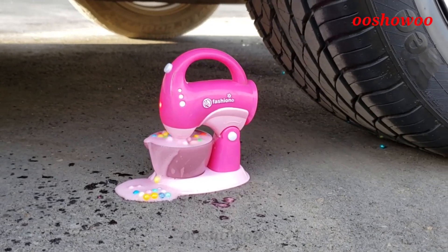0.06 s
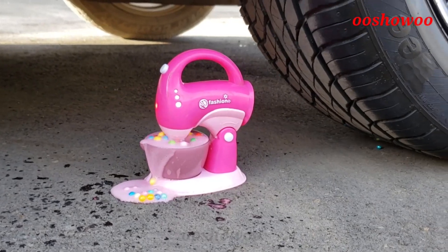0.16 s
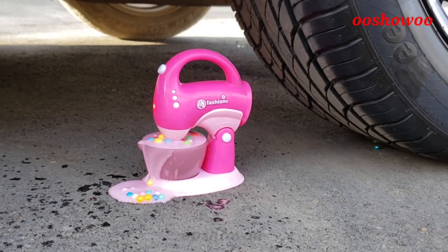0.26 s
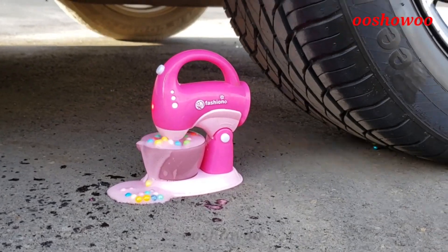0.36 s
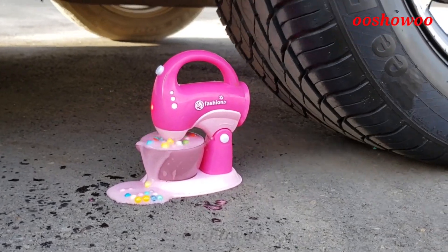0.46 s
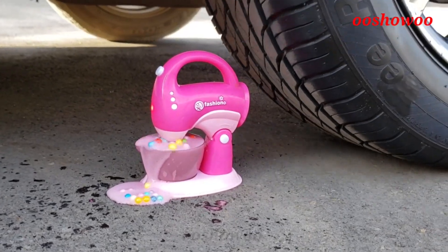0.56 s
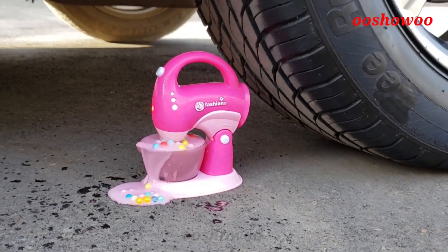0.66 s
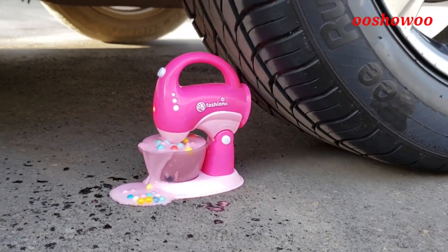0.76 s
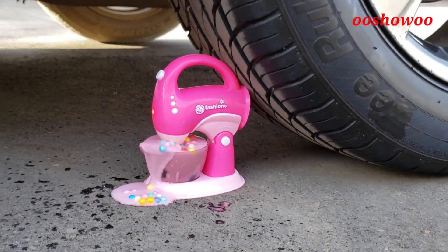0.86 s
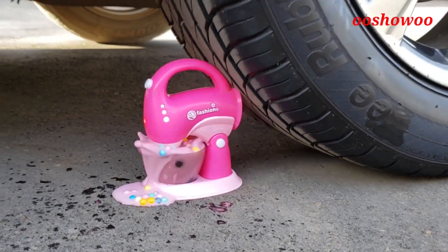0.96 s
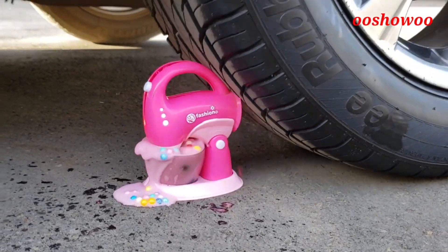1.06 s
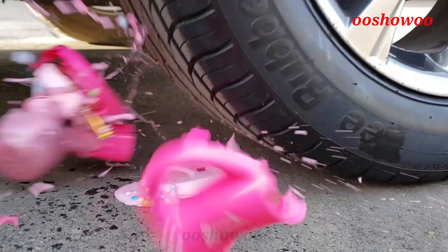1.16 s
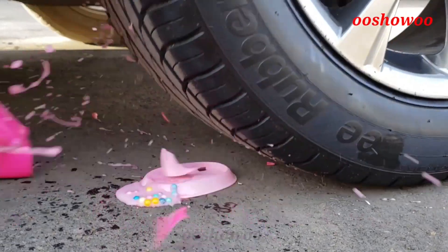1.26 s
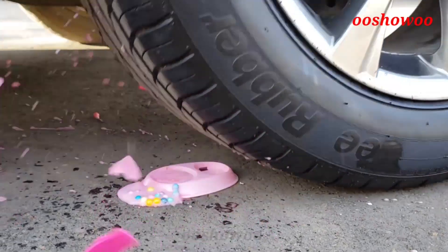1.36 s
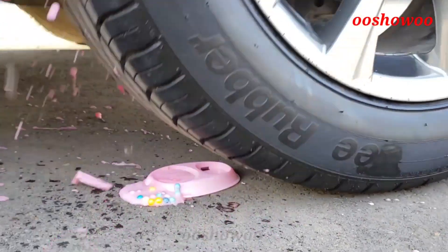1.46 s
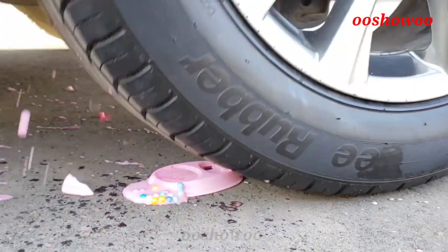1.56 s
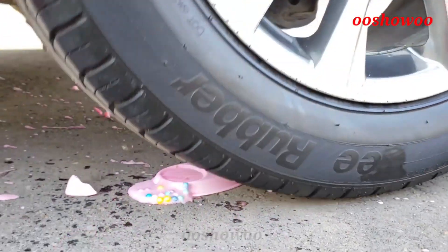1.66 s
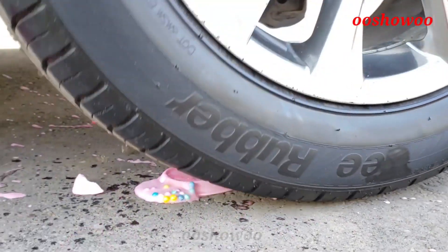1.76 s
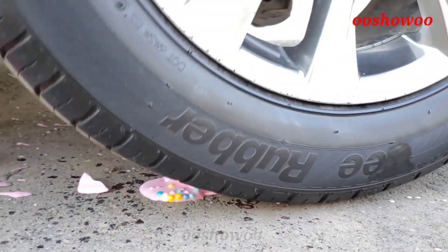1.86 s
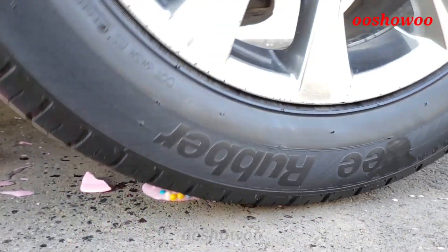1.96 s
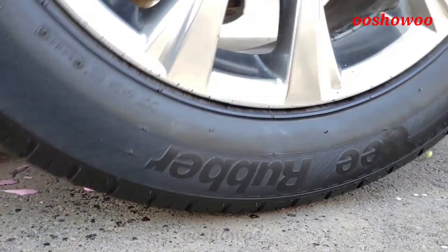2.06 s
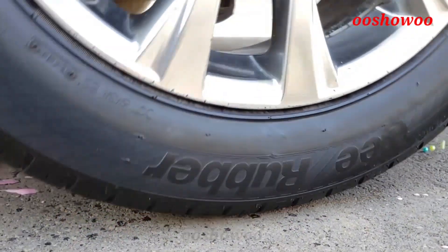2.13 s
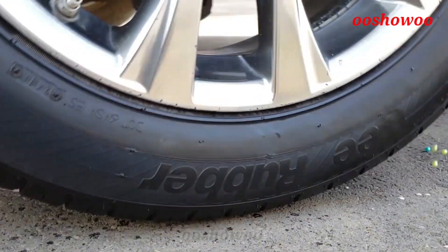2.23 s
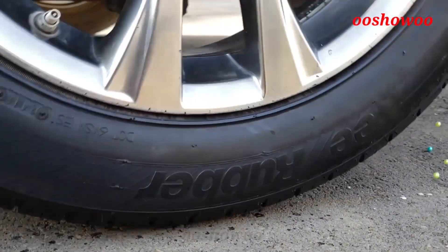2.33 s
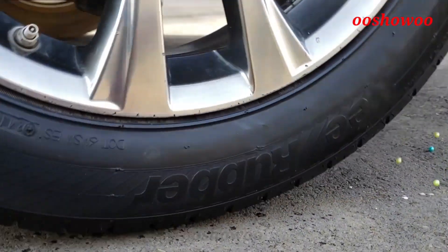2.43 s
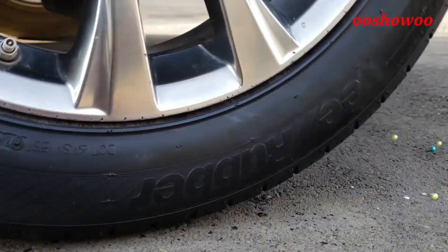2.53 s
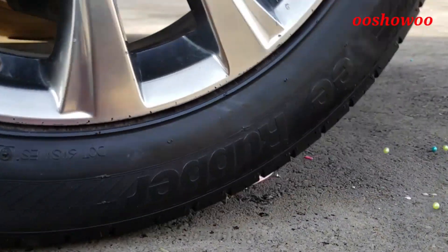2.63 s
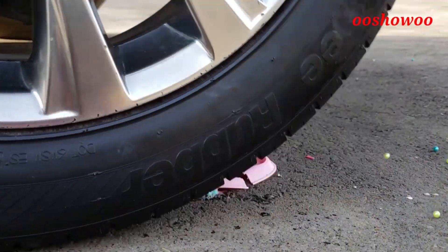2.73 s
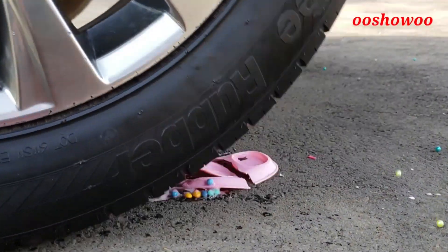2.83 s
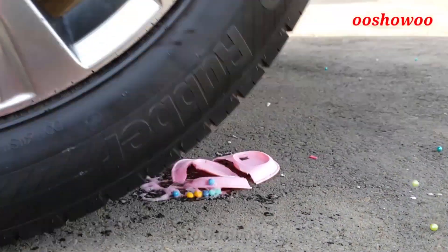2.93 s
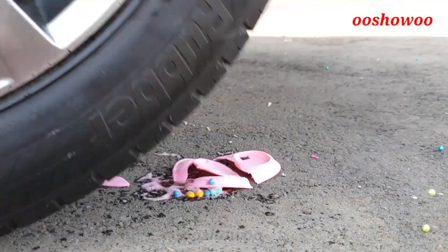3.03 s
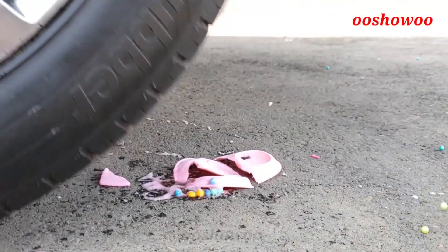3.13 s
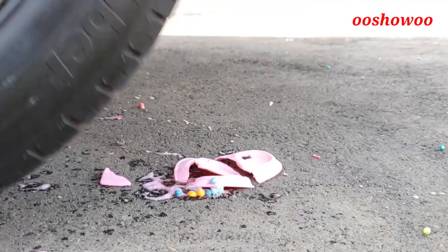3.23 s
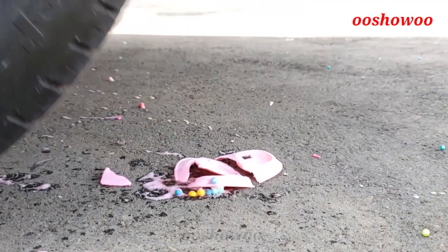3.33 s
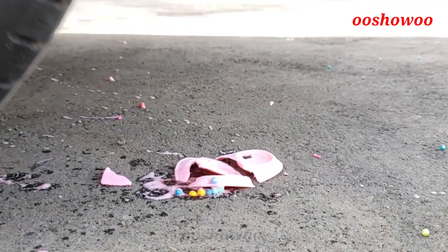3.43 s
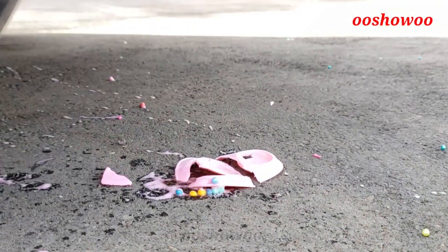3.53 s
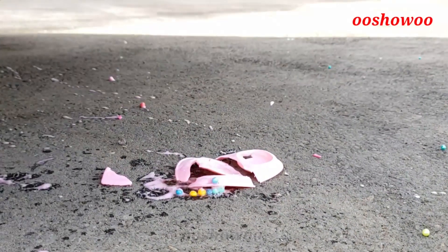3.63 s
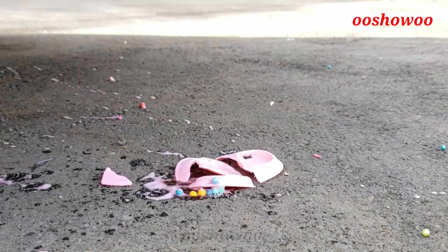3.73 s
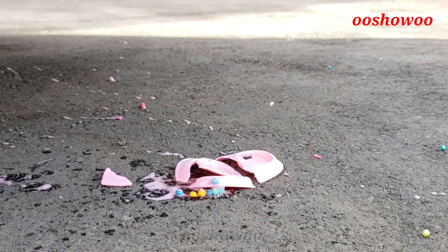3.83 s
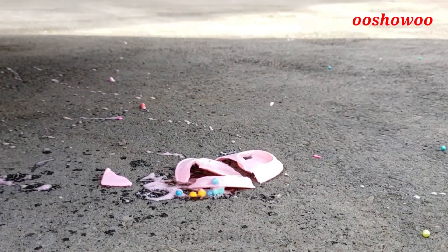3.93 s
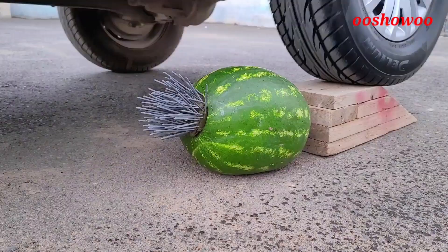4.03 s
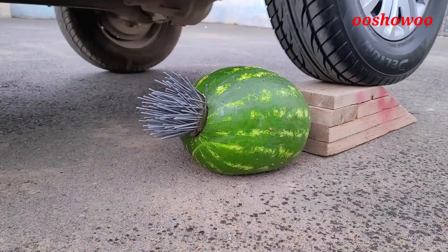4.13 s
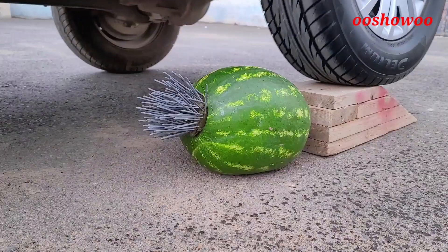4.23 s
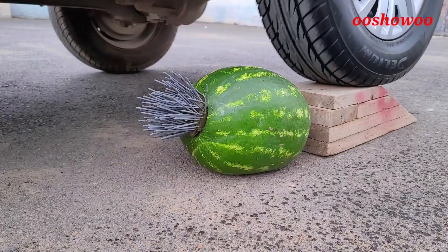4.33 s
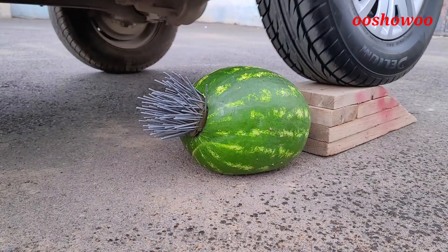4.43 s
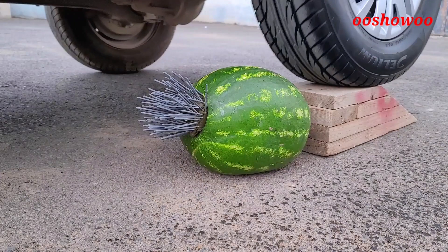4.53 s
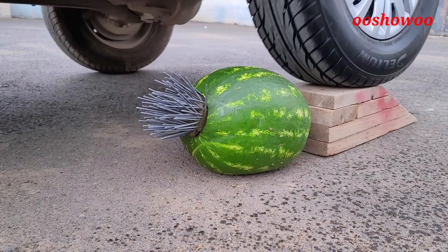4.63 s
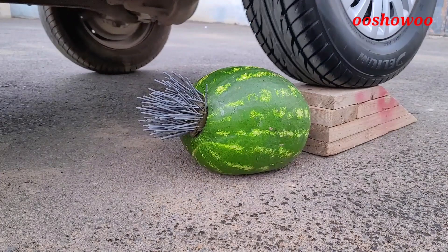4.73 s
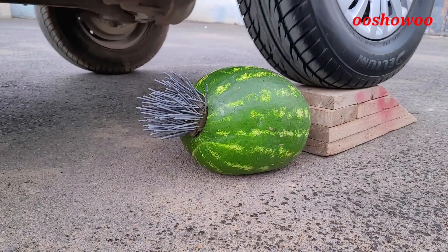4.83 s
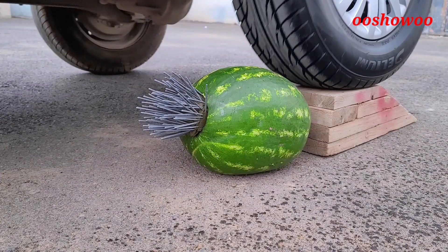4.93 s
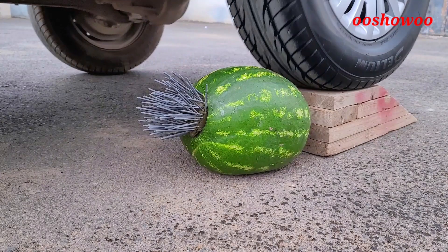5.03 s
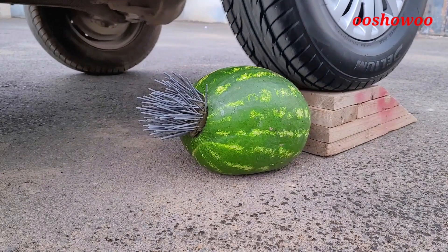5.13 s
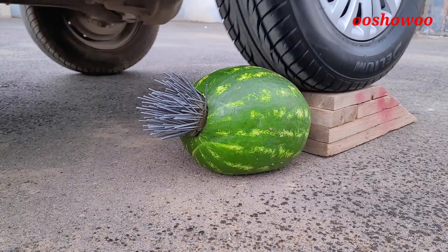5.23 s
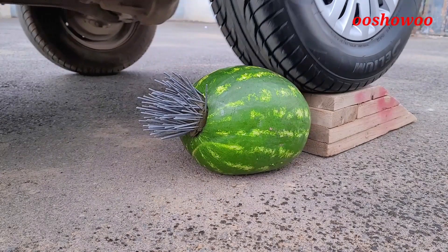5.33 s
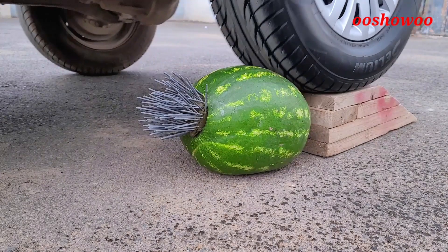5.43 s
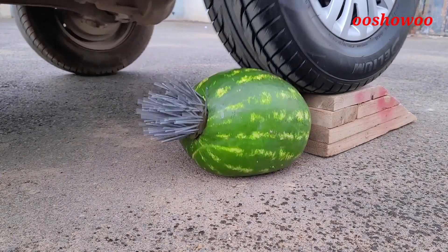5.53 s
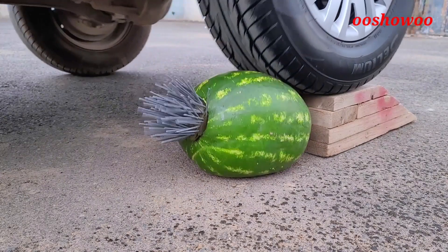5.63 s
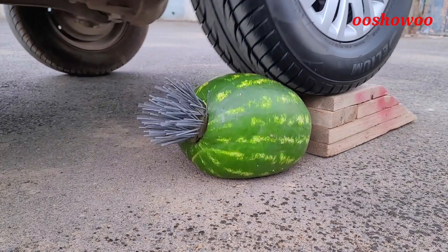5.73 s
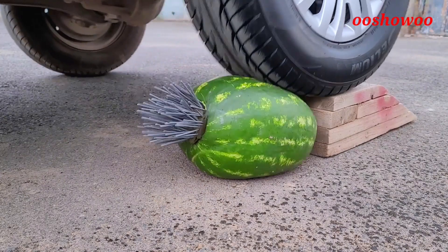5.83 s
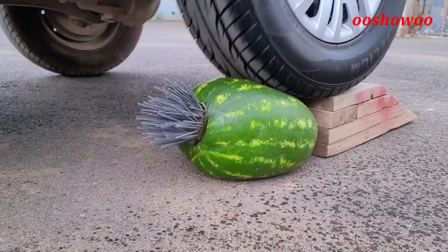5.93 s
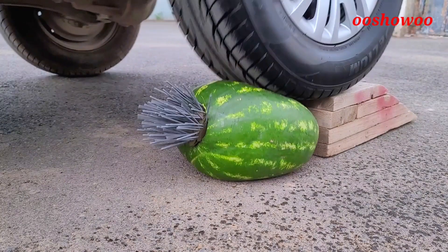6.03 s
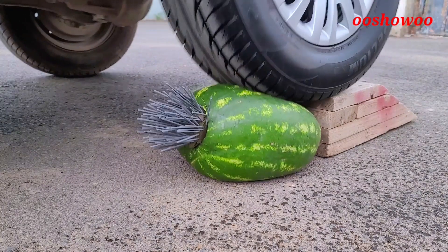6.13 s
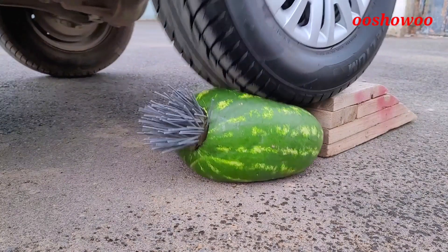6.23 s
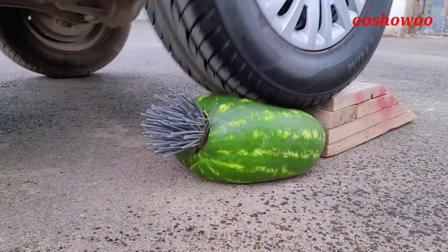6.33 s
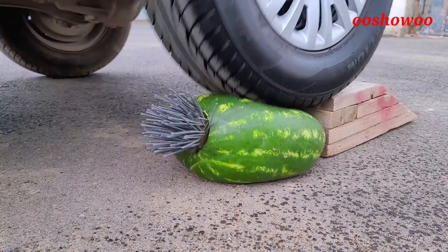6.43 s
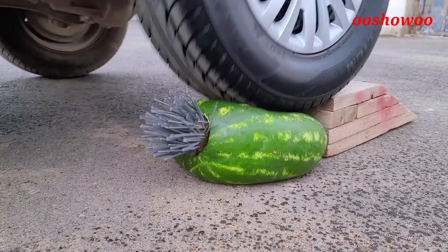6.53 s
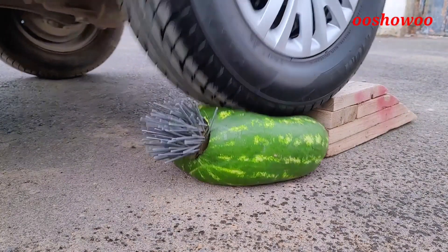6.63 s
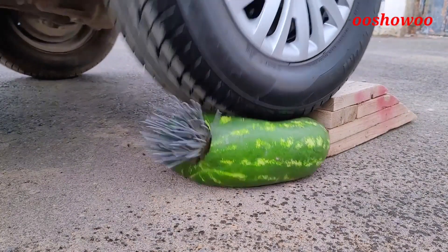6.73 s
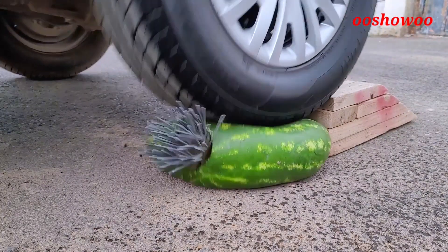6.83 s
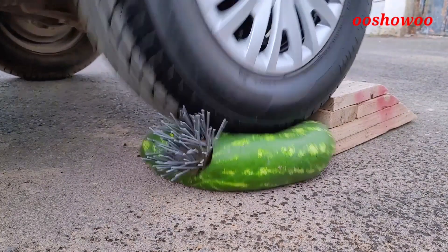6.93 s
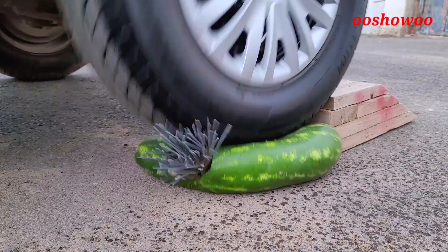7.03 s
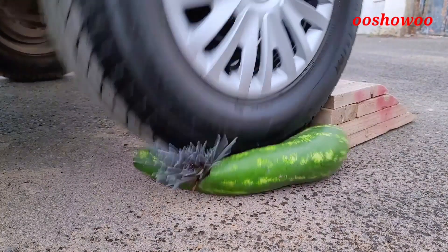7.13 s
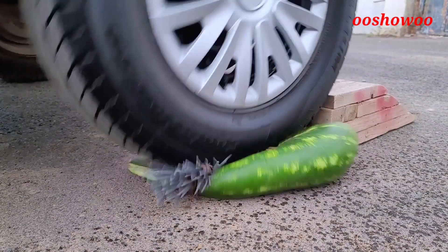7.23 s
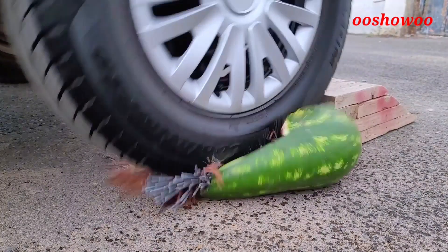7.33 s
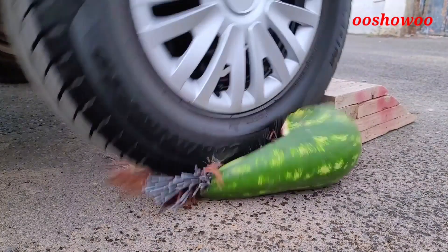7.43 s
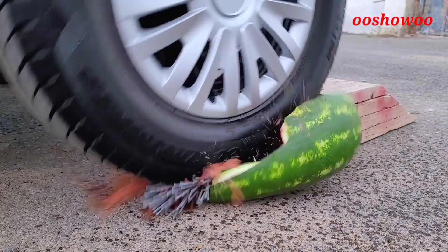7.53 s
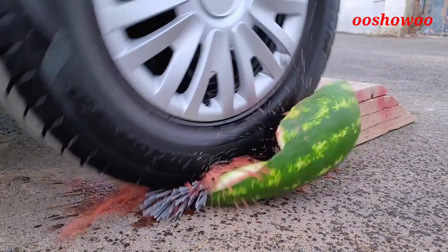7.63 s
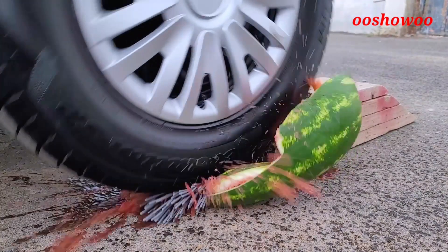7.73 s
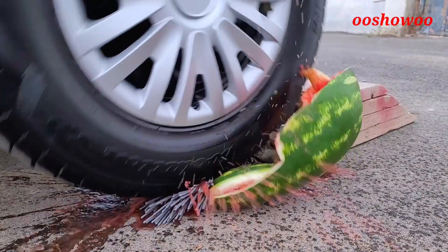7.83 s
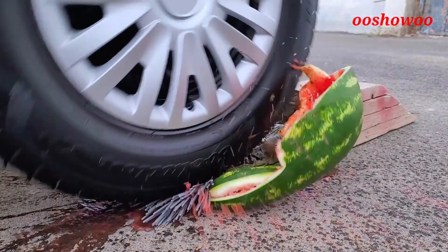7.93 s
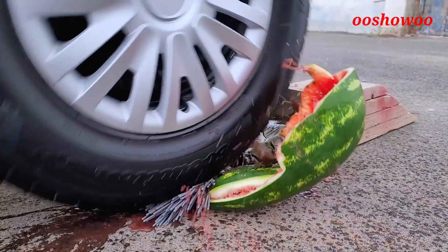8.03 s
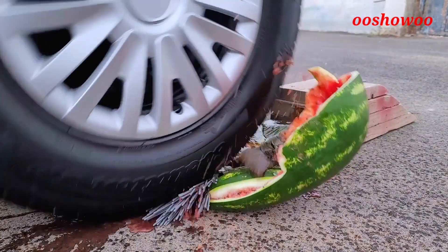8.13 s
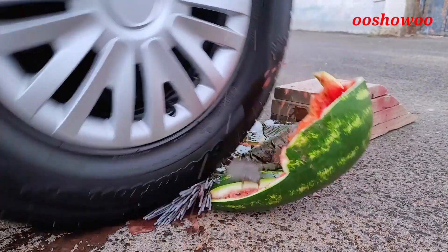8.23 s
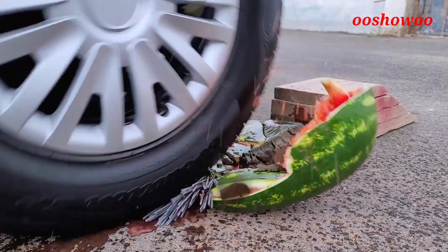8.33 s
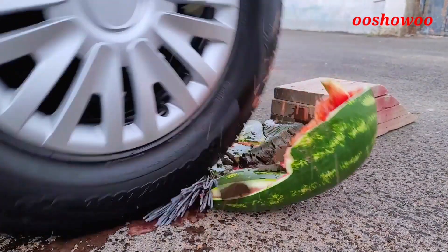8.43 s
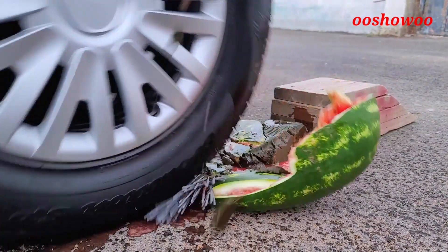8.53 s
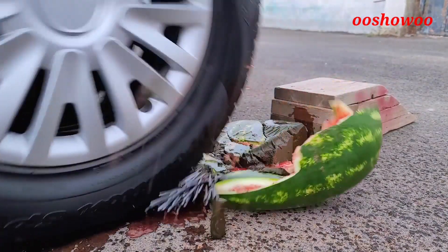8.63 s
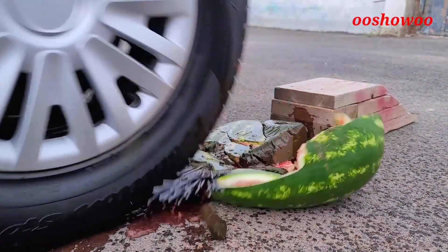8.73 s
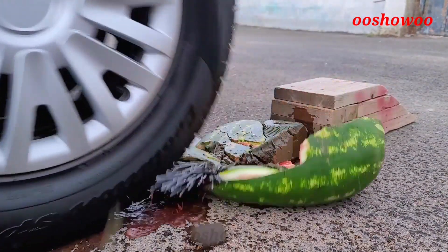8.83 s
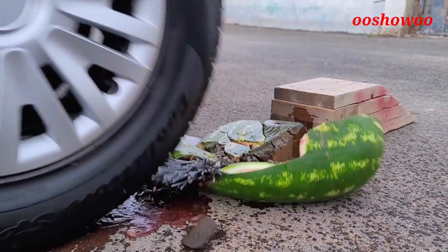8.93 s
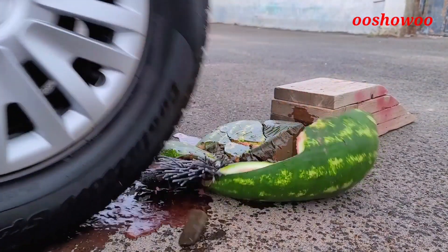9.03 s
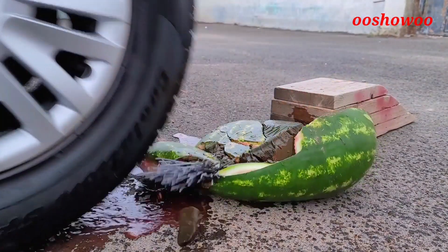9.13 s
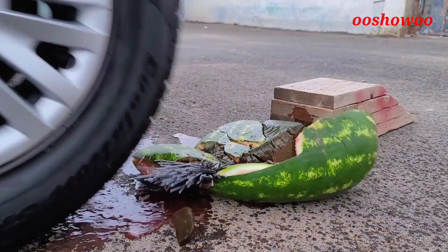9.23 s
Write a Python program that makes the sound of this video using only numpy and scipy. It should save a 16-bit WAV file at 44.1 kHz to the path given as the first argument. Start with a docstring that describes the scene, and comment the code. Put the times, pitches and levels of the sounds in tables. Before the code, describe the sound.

Close stereo pickup outdoors on asphalt. A faint, hissy engine drone runs until about 0.9 s and quickly cuts out. A plastic toy then bursts under a tyre: a tight volley of sharp, bright snaps to 1.16 s, with tearing hiss, a low lurch and hollow knocks. Separate cracks and clacks follow at 1.3-1.55 s, with strong ones at 1.8 and 2.0-2.15 s, over thinning scrapes and grit. Weak snaps come near 2.6 s and 3.3-3.7 s, then tiny taps. At 4.1 s a deep, dull engine throb of about 16 pulses per second fades in and gradually weakens. From 6.0 s melon rind splits with low thuds and woody knocks; wet crunching, squelching and hollow pops cluster until 8 s. Juice gurgles around 7.5-7.7 s; sticks snap sharply at 7.67 and 8.44 s. Last cracks come near 8.55 s, then soft engine and a very faint brief tone at 9.0 s.

```python
"""Crushing a toy and a melon

Two slowed-down scenes on asphalt. First a car tyre cracks a plastic toy: a noise drone for the engine
cuts out, then noise bursts through ringing filters make snaps, shards and debris against near silence.
Slower and duller, an idling car then rolls onto a melon: noise bursts and low sine thuds split the rind,
random grains crunch and squelch as pulp, and filtered bursts snap wire sticks."""
import sys
import numpy as np
from scipy import signal
from scipy.fft import rfft, irfft, next_fast_len
from scipy.io import wavfile
from scipy.ndimage import uniform_filter1d

SR = 44100
rng = np.random.default_rng(int(sys.argv[2]) if len(sys.argv) > 2 else 0)


def to_wav(sig):
    """Store sig (one row per channel, or 1-D mono) as 16-bit WAV at the path in sys.argv[1].

    Samples outside -1..1 are clipped; the rate is SR.
    """
    pcm = np.clip(np.atleast_2d(sig), -1, 1) * 32767
    pcm = np.round(pcm).astype(np.int16)
    wavfile.write(sys.argv[1], SR, pcm.T)  # frames by channels


N = 408807

# Levels inside a sound are relative; t60 is the time to fall by 60 dB.
# engine in the first scene: f/Hz, relative level/dB per Hz
NEAR_DRONE = [(30, -37), (57, -3), (160, -74.5), (281, -4.5), (815, -2.5), (1460, -10.5), (2090, 3),
              (3060, -6.5), (3840, -21.5), (4360, -13), (5770, -26.5), (9500, -32.5), (12000, -35.5),
              (12600, -59)]
# left-right likeness of the first engine: f/Hz, likeness (-1 to 1)
NEAR_SAME = [(80, 0.63), (300, 0.49), (700, 0.29), (1500, -0.18), (6000, -0.1)]
NEAR_DB, NEAR_END_S, NEAR_FADE_S = -48.5, .9, 0.1

# plastic snaps: t/s, level/dB, shard ring f/Hz, fizz level/dB relative to the snap, before a shared 7 dB lift
SNAPS = [(0.91, -31, 1060, -4), (0.918, -32, 2390, -3), (0.928, -9.5, 2580, -15.5),
         (0.982, -19.5, 2620, -5), (1.027, -34, 3030, -3), (1.038, -28.5, 2970, 0), (1.06, -20, 725, -17),
         (1.072, -22.5, 3740, -0.5), (1.079, -14.5, 2540, -10.5), (1.086, -12.5, 734, -6.5),
         (1.1, -14, 3330, -5), (1.12, -15, 2810, -4), (1.15, -15, 3120, -12), (1.158, -26.5, 3060, 5),
         (1.306, -32.5, 930, -15), (1.369, -24.5, 1670, -4), (1.396, -20, 1670, -8.5),
         (1.421, -25, 1650, -15), (1.449, -14, 2120, -20), (1.547, -34.5, 2070, -9), (1.554, -20, 2600, -9),
         (1.711, -23, 1910, -23), (1.767, -35.5, 1710, -10), (1.807, -6, 750, -24),
         (1.844, -15, 3080, -17.5), (2.012, -8, 810, -26.5), (2.048, -6.5, 3120, -19.5),
         (2.087, -23, 786, -19.5), (2.153, -15.5, 617, -9), (2.587, -34.5, 2930, -35),
         (2.625, -22, 2017, -15), (2.66, -30, 1500, -22), (3.261, -29, 3730, -1), (3.415, -23.5, 1560, -12),
         (3.422, -28, 2870, 3), (3.557, -48, 1470, 11), (3.68, -21, 1670, -9)]
# base plate the shards broke from: f/Hz, width/Hz, relative level/dB
BASE = [(1836, 100, -11), (2015, 120, -11), (2860, 260, -4.5)]
# bright fizz of a fresh fracture: f/Hz, relative level/dB per Hz
FIZZ = [(290, -27), (500, -10.5), (765, -8.5), (1790, -9), (3070, -4.5), (4200, -3.5), (12400, -5),
        (13900, -19.5), (14800, -47)]
SNAP_T60_S, SHARD_CYCLES = 0.1, 48  # a shard's ring is 130 Hz wide plus f / SHARD_CYCLES
# shell tearing and skidding, hisses that start at once or swell briefly:
# start t/s, peak t/s, level/dB, t60/s
RIPS = [(0.929, 0.965, -25.5, 0.24), (1.163, 1.166, -16.5, 0.16), (1.342, 1.343, -36, 0.08),
        (2.613, 2.636, -51.5, 0.11), (3.03, 3.05, -50, 0.1)]
# the tyre drops as the toy gives way: t/s, f/Hz, peak level/dB
LURCHES = [(0.986, 38.7, -45), (1.176, 42.54, -28)]
# the car floor hums after two bursts: t/s, level/dB
HUMS = [(.99, -42.5), (1.18, -37)]
HUM_HZ, HUM_T60_S = 140, 0.12
# hollow body knocked on the asphalt: t/s, peak level/dB, rumble f/Hz
KNOCKS = [(1.159, -26.5, 130), (1.808, -31, 170), (2.013, -40, 200), (2.048, -37, 243), (2.153, -22.5, 148),
          (2.628, -51.5, 277), (2.662, -43.5, 258.4), (3.423, -46.5, 190.7)]
# modes of the toy's hollow body: f/Hz, relative level/dB, t60/s
SHELL = [(304.6, -5.5, 0.1), (346, -10.5, .09), (535, -15, 0.082)]
# shards scrape as the tyre presses and lifts off: start t/s, end t/s, first level/dB, last level/dB
DEBRIS = [(1.253, 2.724, -51.5, -79), (3.23, 4.06, -68, -77.5)]
# rustle and grit relative to the scrape; the grit thins out by each end
RUSTLE_DB, GRIT_DB, GRIT_FADE_DB = -12, -4, -22.5
# loose pieces slide a little: t/s, level/dB, f/Hz
SETTLING = [(1.62, -60, 1600), (1.97, -67, 646), (2.4, -82, 3040), (2.512, -68, 2760)]
SETTLE_S = 0.029
# small pieces rock and tap: t/s, level/dB, f/Hz
TAPS = [(2.51, -76, 650), (3.498, -59.5, 1720), (3.638, -71, 477), (3.733, -65, 453), (3.753, -66, 426),
        (3.771, -63, 460), (3.793, -67, 524), (3.905, -75, 405), (3.93, -69, 405), (3.948, -69, 410),
        (4.066, -71.5, 1150)]
# a hollow piece clacking on the asphalt: t/s, peak level/dB
CLACKS = [(1.37, -23.5), (1.396, -33), (1.448, -25.5), (1.554, -32), (1.712, -32), (1.769, -36.5),
          (1.845, -30), (2.013, -26.5)]
# modes of that piece: f/Hz, relative level/dB, t60/s
PIECE = [(1470, -7.5, 0.08), (1670, 1.5, 0.073), (2107, 1, 0.077), (2650, -6.5, .05)]
# left-right likeness of the toy: f/Hz, likeness (-1 to 1)
TOY_SAME = [(100, 0.95), (700, 0.72), (1500, 0.06), (4000, 0.47)]

# engine in the second scene: f/Hz, relative level/dB per Hz
SLOW_DRONE = [(16, -11.5), (28, 5.5), (54, -17.5), (216, -19.5), (259, -29.5), (415, -26.5), (727, -22),
              (1110, -32.5), (2040, -36.5), (2730, -46), (4380, -42), (6000, -61), (7800, -99)]
# pipe and panel resonance in it: f/Hz, width/Hz, relative level/dB
SLOW_RINGS = [(407, 31, 10.5)]
# the car rolls away: t/s, level/dB
SLOW_LEVEL = [(4.1, -30.5), (5.4, -35.5), (5.95, -37.5), (8.0, -43.5), (9.27, -44)]
# left-right likeness of the second engine: f/Hz, likeness (-1 to 1)
SLOW_SAME = [(40, 0.86), (800, 0.2), (2000, 0.088), (5000, 0.4)]
FADE_IN_S = .25
# exhaust throb relative to the drone, with a surge as the car pulls off
THROB_DB, THROB_SURGE_DB, THROB_SETTLE_S = 4, 6, 0.45

# rind splitting: t/s, level/dB, thud f/Hz, thud level/dB relative to the break
BREAKS = [(6.011, -19, 129, -3), (6.104, -17.5, 188, -2), (6.126, -12.5, 112.3, 0.5),
          (6.149, -12, 108, -3.5), (6.468, -18, 120.7, -1.5), (6.505, -15.5, 77.7, -14),
          (6.537, -21.5, 132, -2), (6.598, -10, 90.7, -6), (6.686, -24, 124, 1.5),
          (6.781, -19.5, 73.3, -10.5), (6.837, -24.5, 131, 5.5), (6.9, -20, 117, 4),
          (6.99, -16, 102.7, -2.5), (7.198, -21.5, 298, -5), (7.267, -23, 111.6, -7), (7.458, -15, 282, -5),
          (7.537, -11.5, 217.6, -7.5), (7.608, -14, 192, 5.5), (7.66, -14, 165, -4.5),
          (7.673, -27.5, 128.7, 9.5), (7.764, -15.5, 117, -28), (7.873, -18.5, 284, -9.5),
          (8.263, -24.5, 72.4, -30), (8.534, -18.5, 363, 8), (8.599, -29, 390, 3.5)]
# what rind and pulp ring with: f/Hz, width/Hz, relative level/dB
PULP = [(445, 66, 1.5), (788, 270, 10.5), (1090, 510, 9.5), (1707, 110, 5), (3694, 390, 4)]
# sharp edge of a break: f/Hz, relative level/dB per Hz
SPRAY = [(1200, -58.5), (2200, -5.5), (2900, -15), (3800, 13.5), (5600, 2.5)]
# t60 of a -22 dB break; t60 grows by LONGER_PER_DB (itself in dB) for each dB above that
BREAK_T60_S, LONGER_PER_DB, BREAK_FIZZ_DB = 0.1, 0.4, -11.5
# pulp squeezed under the tread: t/s, crunch level/dB
CRUSH = [(6.1, -44), (6.14, -20.5), (6.22, -46.5), (6.43, -51.5), (6.6, -30), (6.72, -42.5), (7.03, -29),
         (7.3, -33), (7.55, -27), (7.74, -35), (8.0, -43), (8.25, -64), (8.6, -40), (8.75, -68.5)]
# melon and tyre cavity: f/Hz, width/Hz, relative level/dB
HOLLOW = [(122.3, 42, 8.5), (200, 69, -1)]
BOOM_DB, BOOM_FOLLOWS = 4, 0.36  # boom relative to a -41 dB crunch; it swells less than the crunch
# short hollow pops of rind and pulp: t/s, peak level/dB, f/Hz
POPS = [(6.115, -20.5, 328), (6.154, -16, 1500), (6.468, -25, 850), (6.536, -23, 790), (6.688, -24, 817),
        (6.753, -22.5, 790), (6.803, -24, 787), (6.836, -16, 783), (6.901, -19.5, 790), (6.948, -21, 754),
        (6.989, -21, 747), (7.015, -21, 910), (7.106, -16, 890), (7.146, -25.5, 894), (7.198, -27, 598),
        (7.266, -19, 780), (7.278, -21.5, 828), (7.339, -18, 1140), (7.367, -29, 1200),
        (7.727, -26.5, 1040), (7.764, -20.5, 787), (7.805, -24, 970), (7.827, -22, 1060),
        (7.872, -25, 1150), (7.895, -25, 790), (7.916, -23.5, 1030), (7.966, -27, 890), (7.983, -25, 1500),
        (8.546, -20, 422)]
POP_CYCLES, POP_SCALE_S = 4.5, 0.0015  # cavity f over its width; time scale of the crack
# wire sticks snapping: t/s, peak level/dB
STICKS = [(7.329, -24.5), (7.427, -28), (7.667, -12), (8.301, -30.5), (8.441, -18)]
STICK_T60_S = 0.081
GUSH_FROM_S, GUSH_TO_S, GUSH_HZ, GUSH_DB = 7.47, 7.68, 250, -27
MOAN_S, MOAN_HALF_S, MOAN_HZ, MOAN_DB = 9.03, 0.076, 475, -49.5
# left-right likeness of the melon: f/Hz, likeness (-1 to 1)
MELON_SAME = [(60, 0.083), (700, 0.49), (2000, 0.073), (5000, 0.059)]
SLOW_EDGE_HZ, EDGE_HZ = 6000, 14900  # top of the second scene's band, and of the whole sound's


def amp(db):
    """Turn decibels into a plain multiplier."""
    return 10 ** (np.asarray(db) / 20)


def evened(x):
    """Scale to an average (RMS) strength of one."""
    return x / np.sqrt(np.mean(x ** 2) + 1e-20)


def peaked(x):
    """Scale so that the left side peaks at one."""
    return x / abs(x[0]).max()


def read(points, hz):
    """Read a table between its frequencies, on a logarithmic pitch scale."""
    f, value = np.transpose(points)
    return np.interp(np.log(hz + 1), np.log(f + 1), value)


def curve(rows):
    """Every column of a time table, sample by sample."""
    s, *columns = np.transpose(rows)
    return [np.interp(np.arange(N) / SR, s, c) for c in columns]


def within(rows):
    """One while the table runs, with short fades just outside it and zero beyond."""
    t = np.arange(N) / SR
    return np.clip(np.minimum(t - rows[0][0], rows[-1][0] - t) / 0.0065 + 1, 0, 1)


def colour(x, points):
    """Give a sound the table's spectrum, with a filter that never sounds before its input."""
    hz = abs(np.fft.fftfreq(4096, 1 / SR))
    log_gain = np.log(amp(np.maximum(read(points, hz), -100)))
    taps = np.fft.ifft(np.exp(np.conj(signal.hilbert(log_gain)))).real[:2048]
    taps = taps / np.linalg.norm(taps)
    return signal.oaconvolve(x, taps[None], axes=-1)[..., :x.shape[-1]]


def low_pass(x, hz):
    """Remove what lies above a frequency."""
    return signal.oaconvolve(x, signal.firwin(511, hz, window=("kaiser", 9), fs=SR)[None], "same")


def ring(x, hz, width):
    """One damped mode: a wider resonance dies away sooner."""
    r = np.exp(-np.pi * width / SR)
    return signal.lfilter([1, 0, -1], [1, -2 * r * np.cos(2 * np.pi * hz / SR), r * r], x)


def steep_ring(x, hz, width):
    """The same mode twice in a row, which cuts away more of the other pitches."""
    return evened(ring(ring(x, hz, width), hz, width))


def ring_bank(x, modes):
    """Several modes rung by one sound, each brought to its own level."""
    return sum(amp(db) * evened(ring(x, hz, width)) for hz, width, db in modes)


def ports(x, same, lead_s=0.):
    """Two spaced microphones: at each pitch they share part of the sound, and the left may lead."""
    size = next_fast_len(N)
    hz, (left, other) = np.fft.rfftfreq(size, 1 / SR), rfft(x, size)
    likeness = np.clip(read(same, hz), -1, 1)
    shared = likeness * left * np.exp(-2j * np.pi * hz * lead_s)
    right = shared + np.sqrt(1 - likeness ** 2) * other
    return np.array([x[0], irfft(right, size)[:N]])


def patchy(points, patch_db):
    """Noise with drifting louder and softer patches."""
    hz = np.fft.rfftfreq(1024, 1 / SR)
    a, b, c, d, patches = rng.standard_normal((N // 256 + 5, 513, 5)).T
    patches = evened(uniform_filter1d(uniform_filter1d(patches, 10, 0), 12, 1))
    gain = amp(read(points, hz)[:, None] + patch_db * patches)
    spectrum = np.array([a + 1j * b, c + 1j * d]) * gain
    return evened(signal.istft(spectrum, nperseg=1024, noverlap=768)[1][:, :N])


def crackle(per_s, spread_db, grain_s):
    """Tiny fractures at random moments, a few much larger, each a short burst of noise."""
    size = amp(spread_db * np.minimum(rng.exponential(1, N), 4)) * (rng.random(N) < per_s / SR)
    power = signal.lfilter([1], [1, -np.exp(-1 / (grain_s * SR))], size ** 2)
    return evened(np.sqrt(power) * rng.standard_normal((2, N)))


def add(mix, s, sound, pan_db):
    """Mix in a sound from a given second; a positive pan favours the left."""
    part = mix[:, round(s * SR):][:, :sound.shape[1]]
    part += (sound * amp([[pan_db / 2], [-pan_db / 2]]))[:, :part.shape[1]]


def near_engine():
    """First engine: a patchy noise drone that soon cuts out."""
    t = np.arange(N) / SR
    fade = np.clip(1 - (t - NEAR_END_S) / NEAR_FADE_S, 0, 1)
    return ports(amp(NEAR_DB) * fade * patchy(NEAR_DRONE, 2.84), NEAR_SAME)


def snaps():
    """Each fracture is a noise burst that rings a shard and the base plate and sprays bright fizz."""
    out, t = np.zeros((2, N)), np.arange(12000) / SR
    noise = rng.standard_normal((len(SNAPS), 2, len(t)))
    sides_db = 0.3 + 2.5 * rng.standard_normal(len(SNAPS))
    for (s, db, hz, fizz_db), z, pan_db in zip(SNAPS, noise, sides_db):
        # a sharp first break, its decay, and a weaker tail thrown back by ground and car floor
        burst = z * (2.0 * np.exp(-t / 0.0032) + amp(-60 * t / SNAP_T60_S) + amp(-19 - 60 * t / 0.3))
        click = 0.69 * np.exp(-abs(t - .001) / .00003)
        burst = burst * (1 - np.exp(-t / 0.00064)) + click
        blow = burst * (0.58 + np.exp(-t / 0.0048))
        base = sum(amp(g) * ring(blow, f, w) for f, w, g in BASE)
        shard = peaked(ring(blow, hz, 130.0 + hz / SHARD_CYCLES) + base)
        fizz = peaked(colour(burst * (0.37 + np.exp(-t / 0.027)), FIZZ))
        # every fizz is raised by a further 7 dB
        add(out, s, amp(db) * (amp(-7.5) * shard + amp(fizz_db + 7.0) * fizz), pan_db)
    return out


def rips():
    """Tearing, skidding plastic: fizz-coloured noise starts at once or swells briefly, then dies away."""
    out, t = np.zeros((2, N)), np.arange(12000) / SR
    for start, peak, db, t60 in RIPS:
        rise = np.clip(t / (peak - start), 0, 1) ** 2
        fall = amp(-60 * np.maximum(t - peak + start, 0) / t60)
        hiss = colour(rng.standard_normal((2, len(t))), FIZZ)
        add(out, start, amp(db) * rise * fall * hiss, 0)
    return out


def lurches():
    """The dropping tyre gives a few deep, quickly damped swings."""
    out, t = np.zeros((2, N)), np.arange(12000) / SR
    for s, hz, db in LURCHES:
        swing = t * hz * np.exp(-t * hz * 2.2) * np.sin(2 * np.pi * hz * t)
        add(out, s, amp(db) * peaked(np.array([swing, swing])), 0)
    return out


def floor_hums():
    """The car floor hums after a burst: a low sine that dies away."""
    out, t = np.zeros((2, N)), np.arange(12000) / SR
    hum = amp(-60 * t / HUM_T60_S) * np.sin(2 * np.pi * HUM_HZ * t) * (1 - t / t[-1])
    for s, db in HUMS:
        add(out, s, amp(db) * np.array([hum, hum]), 0)
    return out


def knocks():
    """Each knock rings the hollow body, which then judders on the ground as a low rumble."""
    out, t = np.zeros((2, N)), np.arange(12000) / SR
    shell = sum(amp(db - 60 * t / t60) * np.sin(2 * np.pi * hz * t) for hz, db, t60 in SHELL)
    thump = shell * (1 - np.exp(-t / 0.0006))
    for (s, db, hz), z in zip(KNOCKS, rng.standard_normal((len(KNOCKS), len(t)))):
        fade = amp(-13.5 - 60 * t * hz / 55.0) * (1 - t / t[-1])
        rumble = evened(ring(ring(z, hz, hz / 2), hz, hz)) * fade
        add(out, s, amp(db) * peaked(np.ones((2, 1)) * (thump + rumble)), -1.5)
    return out


def debris():
    """Scattered scrapes of many pitches dying away under bright grit, short slides and small taps."""
    grit, t = crackle(600, 3.3, .004), np.arange(N) / SR
    pitches = np.geomspace(1250., 2400., num=5)
    scrape = evened(sum(steep_ring(crackle(80, 3.5, .003), hz, hz / 5.) for hz in pitches))
    rustle = steep_ring(grit, 560, 350.)
    scrape_gain, grit_gain, out = np.zeros(N), np.zeros(N), np.zeros((2, N))
    for start, end, first_db, last_db in DEBRIS:
        span = [(start, first_db, GRIT_DB), (end, last_db, GRIT_DB + GRIT_FADE_DB)]
        level_db, grit_db = curve(span)
        scrape_gain += within(span) * amp(level_db)
        grit_gain += within(span) * amp(level_db + grit_db)
    for s, db, hz in SETTLING:
        out += amp(db) * np.exp(-((t - s) / SETTLE_S) ** 2) * steep_ring(grit, hz, hz / 2)
    for (s, db, hz), z in zip(TAPS, rng.standard_normal((len(TAPS), 2, 2000))):
        push = z * np.exp(-t[:2000] / 0.0077)
        add(out, s, amp(db) * evened(ring(ring(push, hz, hz / 4.1), hz, hz)), 0)
    return out + scrape_gain * (scrape + amp(RUSTLE_DB) * rustle) + grit_gain * colour(grit, FIZZ)


def clacks():
    """Each landing wakes the modes of a hollow piece by different amounts and shifts their pitches a little."""
    out, t = np.zeros((2, N)), np.arange(6000) / SR
    hz, db, t60 = np.transpose(PIECE)[:, :, None]
    for (s, peak_db), c in zip(CLACKS, rng.standard_normal((len(CLACKS), 2, len(PIECE), 2))):
        woken_db = 3 * c[..., :1]
        bend = 1 + .05 * c[0, :, 1:]
        swing = np.sin(2 * np.pi * (hz * bend * t + c[..., 1:]))
        modes = amp(db + woken_db - 60 * t / t60) * swing
        # the piece rattles while it rings, which blurs every mode
        rattle = evened(uniform_filter1d(rng.standard_normal(modes.shape), size=150))
        modes = modes * (1 + 0.28 * rattle)
        add(out, s, amp(peak_db) * peaked(modes.sum(axis=1) * (1 - np.exp(-t / 0.00078))), 0)
    return out


def toy():
    """All sounds of the breaking toy, heard by two microphones."""
    parts = snaps() + rips() + lurches() + floor_hums() + knocks() + debris() + clacks()
    return ports(parts, TOY_SAME, lead_s=0.00012)


def slow_engine():
    """Second engine: a patchy, ringing noise drone plus a slow sine throb from the exhaust."""
    t = np.arange(N) / SR
    # the idle hunts a little, so the throb wanders in pitch around 16 Hz
    wander = evened(uniform_filter1d(rng.standard_normal(N), size=6000))
    turns = np.cumsum(16.0 * (1 + .03 * wander)) / SR
    since = np.maximum(t - SLOW_LEVEL[0][0], 0)
    throb_db = THROB_DB + THROB_SURGE_DB * np.exp(-(since / THROB_SETTLE_S) ** 2)
    throb = amp(throb_db) * np.sin(2 * np.pi * turns - np.array([[0], [.9]]))
    drone = patchy(SLOW_DRONE, 2.2)
    rings = evened(ring_bank(drone, SLOW_RINGS))
    drone = (drone + amp(-14.0) * rings) * (1 + 0.09 * np.cos(2 * np.pi * turns))
    level = amp(curve(SLOW_LEVEL)[0]) * np.minimum(since / FADE_IN_S, 1) ** 2
    # the engine sits to one side, so its drone reaches the left microphone first
    return level * (ports(drone, SLOW_SAME, lead_s=0.00158) + throb)


def rind_breaks():
    """Each split of the rind is a ringing knock, a low sine thud and a spray of fizz."""
    out, t = np.zeros((2, N)), np.arange(8000) / SR
    noise = rng.standard_normal((len(BREAKS), 2, len(t)))
    # every break lands elsewhere: its side and the modes it wakes differ
    chance = rng.standard_normal((len(BREAKS), len(PULP) + 2))
    for (s, db, thud_hz, thud_db), z, c in zip(BREAKS, noise, chance):
        t60 = BREAK_T60_S * amp(LONGER_PER_DB * (db + 22.0))
        burst = (1.1 + z) * 3.3 * np.exp(-t / 0.00067) + z * amp(-60 * t / t60)
        # wet rind gives way over a couple of milliseconds
        burst = burst * (1 - np.exp(-t / 0.00052)) ** 2
        woken = [(f, w, g + 2.5 * u) for (f, w, g), u in zip(PULP, c)]
        knock = peaked(ring_bank(burst, woken))
        fizz = peaked(colour(burst, SPRAY))
        # soft flesh damps every thud after the same number of cycles; it reaches the sides out of step
        turn = np.array([[0], [0.8 * c[-2]]])
        fade = (1 - np.exp(-t / 0.00038)) * amp(-60 * t * thud_hz / 15.3)
        thud = fade * np.sin(2 * np.pi * thud_hz * t - turn)
        split = amp(-4.0) * knock + amp(BREAK_FIZZ_DB) * fizz + amp(thud_db) * thud
        add(out, s, amp(db) * split, 2.0 * c[-1])
    return out


def squelch():
    """Many small cells burst at random, each a short ring at its own pitch and side."""
    size = amp(3.0 * np.minimum(rng.exponential(1, N), 3)) * (rng.random(N) < 700. / SR)
    pitches = np.geomspace(550., 2300., num=16)
    cell, sides = rng.integers(0, len(pitches), N), rng.choice([-1, 1], (len(pitches), 1))
    rings = np.array([ring(ring(size * (cell == k), hz, hz / 6.5), hz, hz) * hz
                      for k, hz in enumerate(pitches)])
    return evened(np.array([rings.sum(axis=0), (sides * rings).sum(axis=0)]))


def crushed_pulp():
    """Squeezed pulp crunches and squelches in fits, over a hollow boom from the cavity."""
    crunch_db = curve(CRUSH)[0]
    boom_db = BOOM_DB - (1 - BOOM_FOLLOWS) * (crunch_db + 41.0)
    boom = evened(ring_bank(crackle(110, 5.55, 0.012), HOLLOW))
    # each mode has grains of its own, and large cracks wake them all
    cracks = crackle(400, 4.5, .004)
    crunch = evened(sum(amp(g) * evened(ring(0.4 * cracks + crackle(370, 1.6, 0.0057), f, w))
                        for f, w, g in PULP))
    # the pulp gives way in fits, with quieter gaps
    fits = amp(2.13 * evened(uniform_filter1d(rng.standard_normal(N), size=1200)))
    wet = fits * (amp(-6.5) * crunch + amp(-7.0) * squelch())
    return within(CRUSH) * amp(crunch_db) * (wet + amp(boom_db) * boom)


def pops():
    """Each pop is a brief crack ringing one small cavity, with a second ring at 1850 Hz."""
    out, t = np.zeros((2, N)), np.arange(2000) / SR
    for (s, db, hz), z in zip(POPS, rng.standard_normal((len(POPS), 2, len(t)))):
        crack = (1 + 0.3 * z) * t / POP_SCALE_S * np.exp(-t / POP_SCALE_S * 3.0) * rng.choice([-1, 1])
        crack = crack + 0.13 * z * np.exp(-t / 0.0072)
        pop = ring(crack, hz, hz / POP_CYCLES) + .6 * ring(crack, 1850., 600.)
        add(out, s, amp(db) * peaked(pop), -2.0)
    return out


def sticks():
    """A snapping wire stick is a sharp noise burst with a short bright tail."""
    out, t = np.zeros((2, N)), np.arange(8000) / SR
    for (s, db), z in zip(STICKS, rng.standard_normal((len(STICKS), 2, len(t)))):
        fade = 2.7 * np.exp(-t / 0.0016) + amp(-60 * t / STICK_T60_S)
        snap = z * (1 - np.exp(-t / 0.00058)) * fade
        add(out, s, amp(db) * peaked(colour(snap, SPRAY)), 0)
    return out


def gush():
    """The melon bursts and juice gurgles out: lumpy grains ring one low, wide mode."""
    gurgle = evened(ring(crackle(80, 4.2, 0.013), GUSH_HZ, 90.))
    return amp(GUSH_DB) * within([[GUSH_FROM_S], [GUSH_TO_S]]) * gurgle


def moan():
    """A faint, short sine tone near the end."""
    t = np.arange(N) / SR
    swell = np.exp(-((t - MOAN_S) / MOAN_HALF_S) ** 4)
    return amp(MOAN_DB) * swell * np.sin(2 * np.pi * MOAN_HZ * t)


def melon():
    """All sounds of the crushed melon and the late tone, a little stronger on the right before the microphones."""
    parts = rind_breaks() + crushed_pulp() + pops() + sticks() + gush() + moan()
    return ports(parts * amp([[-1.2], [1.2]]), MELON_SAME, lead_s=.0001)


def scene():
    """The toy, then the melon; slowing the second scene has pulled its whole band down."""
    first = near_engine() + toy()
    second = slow_engine() + melon()
    return first + low_pass(second, SLOW_EDGE_HZ)


def record(dry):
    """Limit the band: the highest treble is removed."""
    return low_pass(dry, EDGE_HZ)


dry = scene()
out = record(dry)
to_wav(out)
```